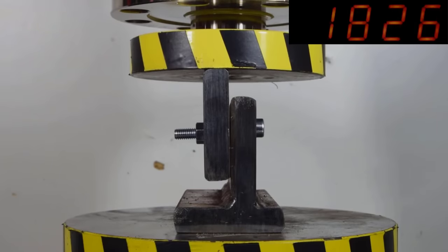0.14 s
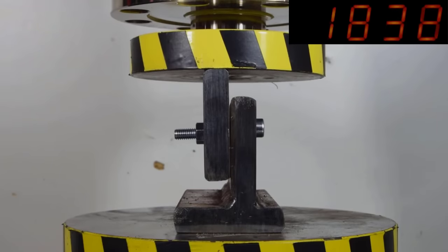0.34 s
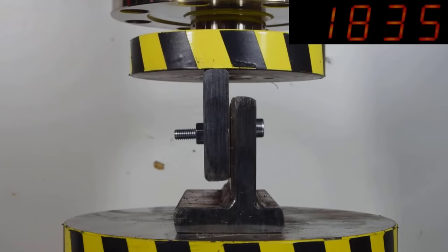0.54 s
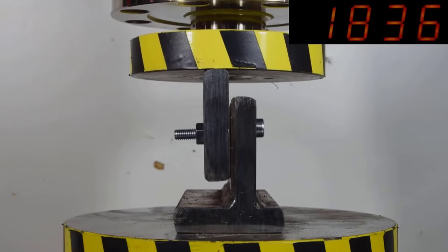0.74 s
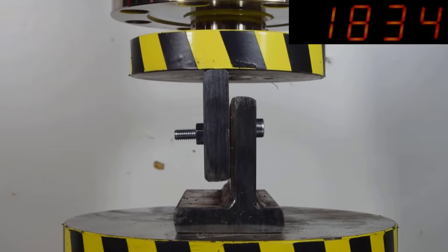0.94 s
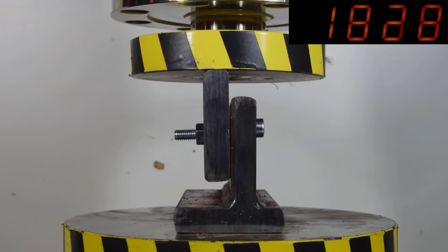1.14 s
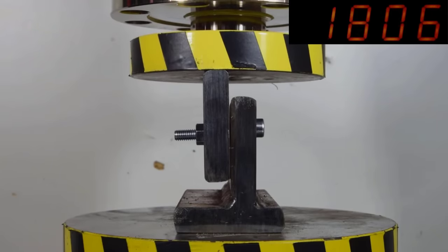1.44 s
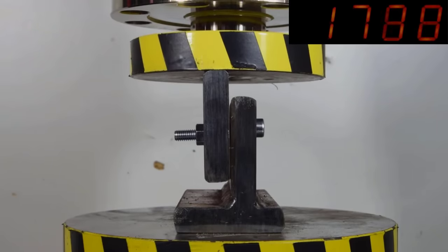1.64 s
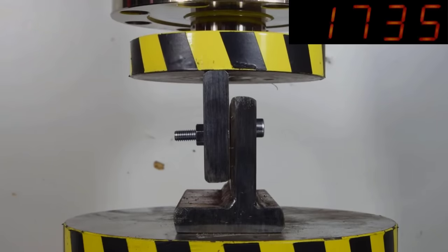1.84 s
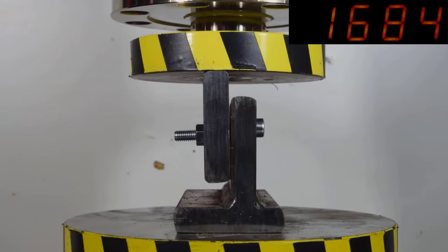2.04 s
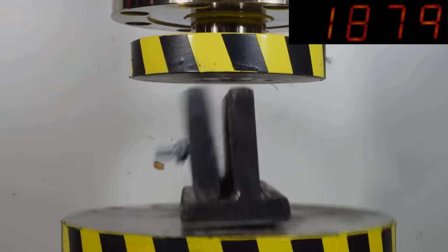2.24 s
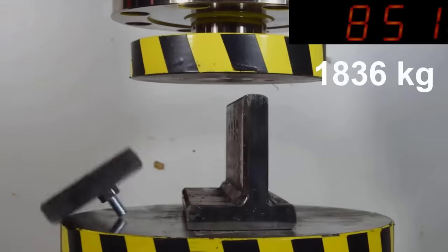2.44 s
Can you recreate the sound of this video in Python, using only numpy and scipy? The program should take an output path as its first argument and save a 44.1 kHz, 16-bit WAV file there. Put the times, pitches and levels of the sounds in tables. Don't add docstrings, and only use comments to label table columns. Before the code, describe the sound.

A steel bolt shears with a very loud, sharp crack at about 2.24 seconds. Before it, a hydraulic pump knocks softly about five times a second over faint, slowly rising motor whine, hum and hiss, with a slight valve puff near 1.3. The frame booms, a plate clatters rapidly until 2.33, bounces ringing at 2.39, then ticks and thuds to 2.6 in a reverberant workshop.

```python
import sys
import numpy as np
from scipy import signal
from scipy.fft import rfft, irfft
from scipy.io import wavfile
from scipy.ndimage import uniform_filter1d, minimum_filter1d

SR = 44100
rng = np.random.default_rng(int(sys.argv[2]) if len(sys.argv) > 2 else 0)


def magnitude_from_level(level_db):
    exponent = np.asarray(level_db, float) / 20
    return 10 ** exponent


def wav_out(sig):
    wavfile.write(sys.argv[1], SR, np.round(np.clip(np.atleast_2d(sig).T, -1, 1) * 32767).astype(np.int16))


N = 114660
BANDS_HZ = 30 * 2 ** np.arange(0, 9.1, .5)


def noise(hz, octaves, size=N):
    f = np.arange(size // 2 + 1) * SR / size + 1e-3
    skirt = 1 + (2 * np.log2(f / hz) / octaves) ** 4
    x = irfft(rfft(rng.standard_normal(size)) / skirt, size)
    return x / x.std()


def read(table, hz, column):
    table = np.array(table)
    return np.interp(np.log(hz), np.log(table[:, 0]), table[:, column])


def since(s, longest=.5):
    return np.arange(int(s * SR) + 1, min(N, int((s + longest) * SR))) / SR - s


def add(out, s, x):
    at = int(s * SR) + 1
    out[at:at + len(x)] += x


def fade(u, t60):
    return np.exp(-np.log(1000) * u / t60)


def ring(modes, u, jitter=0., loose=1):
    out = 0
    for hz, db, t60 in modes:
        level_luck, pitch_luck, phase_luck = rng.standard_normal(3)
        pitch = hz * (1 + 0.12 * jitter * pitch_luck)
        level = magnitude_from_level(db + 60 * jitter * level_luck)
        out = out + level * fade(u, t60) * np.sin(2 * np.pi * pitch * u + loose * phase_luck)
    return out


def shudder(bank, table, s, u):
    at, out = int(s * SR), 0
    for hz, x in zip(BANDS_HZ, bank):
        if table[0][0] / 2 < hz < table[-1][0] * 2:
            out = out + magnitude_from_level(read(table, hz, 1)) * fade(u, read(table, hz, 2)) * x[at:at + len(u)]
    return out


def bursts(rows, octaves):
    out = np.zeros(N)
    for s, db, t60, hz in rows:
        u = since(s)
        add(out, s, magnitude_from_level(db) * fade(u, t60) * noise(hz, octaves, size=SR // 2)[:len(u)])
    return out


# (frequency [Hz], level [dB per Hz])
SHOP_SPECTRUM = [(25, -11), (60, -18), (150, -9.5), (500, -10.5), (1200, -15.5), (2500, -22), (7700, -36.5),
                 (16000, -42)]
SHOP_DB = -73.5


def shop():
    out = 0
    for hz in BANDS_HZ:
        out = out + magnitude_from_level(read(SHOP_SPECTRUM, hz, 1)) * hz ** .5 * noise(hz, 0.63)
    return magnitude_from_level(SHOP_DB) * out / out.std()


# (time [s], pitch [Hz], load boost [dB])
MOTOR_LOAD = [
    (0, 996.5, 6),
    (1.101, 1014, 3),
    (1.75, 1022, 8),
    (2.24, 1029, 13),
]
# (multiple, level [dB])
MOTOR_HARMONICS = [(1, -83.5), (2, -88.5), (3, -91), (4, -93.5), (5, -95.5), (6, -101), (8, -99)]
# (multiple, centre [s], half width [s], boost [dB])
MOTOR_SWELLS = [(1, 0.29, 0.29, 5.5), (3, .17, 0.087, 5), (3, 1.1, 0.17, 7), (3, 2.037, 0.18, 13),
                (4, 0.11, 0.1, 6.5), (4, .5, 0.1, 5), (5, 0.27, .22, 8), (5, 1.28, .2, 7),
                (5, 1.773, 0.17, 3), (6, 0.71, 0.27, 12), (6, 1.2, .2, 11.5), (6, 2.0, 0.14, 14)]


def whine(t):
    s, hz, load_db = np.array(MOTOR_LOAD).T
    phase = 2 * np.pi * np.cumsum(np.interp(t, s, hz)) / SR
    out = 0
    for k, db in MOTOR_HARMONICS:
        flicker = uniform_filter1d(uniform_filter1d(rng.standard_normal(N), size=2500), size=2500)
        db = db + 1.2 * flicker / flicker.std()
        if k == 2:
            db = db + np.interp(t, s, load_db)
        for multiple, centre, width, up_db in MOTOR_SWELLS:
            if multiple == k:
                db = db + up_db * np.exp(-((t - centre) / width) ** 2)
        out = out + magnitude_from_level(db) * np.sin(k * phase)
    return out


# (time [s], level [dB], clank level [dB], tick level [dB], tap level [dB])
STROKES = [(0.084, -49.5, -61, -76, -75), (0.282, -51.5, -68, -83.5, -73), (0.498, -51.5, -66, -92, -69),
           (0.712, -51.5, -60, -75.5, -74), (0.901, -49.5, -67, -81, -73.5),
           (1.079, -50.5, -67.5, -87, -69.5), (1.258, -51.5, -59.5, -77.5, -78),
           (1.443, -51.5, -69, -83, -69.5), (1.623, -50, -66, -91, -72.5), (1.8, -50.5, -60.5, -75.5, -79),
           (1.988, -52, -67, -82, -72), (2.161, -52, -66.5, -84, -70.5)]
# (delay [s], level [dB])
PISTON_REBOUNDS = [
    (0, 0),
    (.011, -3),
    (.019, -4.5),
    (0.045, -6.5),
    (0.076, -19),
]
# (frequency [Hz], level [dB], t60 [s])
HOUSING_MODES = [(181.6, -18.5, 0.3), (254.3, -16, 0.25), (406, -8, 0.2), (428, -6.5, 0.11),
                 (486.6, -5.5, 0.11), (509.7, -1, 0.24), (699, -11, 0.16), (806, -8, 0.082),
                 (980, -11, 0.084)]
CLANK_MODES = [(1227, 2, 0.088), (1278, -2, 0.17), (1635, -8.5, 0.1)]
TICK_MODES = [(5370, -9.5, 0.079), (6900, -4, 0.033), (7480, -2.5, 0.034), (7650, -1.5, .04)]
TAP_MODES = [(2174, -4.5, 0.051), (2413, 1, 0.046), (2566, -3, 0.051), (2817, -1.5, 0.053),
             (2847, -15, 0.56)]
# (frequency [Hz], level [dB], t60 [s])
STROKE_SHUDDER = [(208, -39.5, 0.26), (450, -17, 0.24), (1140, -17, 0.24), (2350, -28.5, 0.13),
                  (3630, -39.5, 0.23)]
CLICK_SHUDDER = [(2500, -10, 0.098), (4960, -5.5, 0.14), (8000, -4, 0.087), (12000, -12, 0.033)]
PUSH_S, SEAT_S = 0.0049, 0.027


def pump(bank):
    out = np.zeros(N)
    for s, db, clank_db, tick_db, tap_db in STROKES:
        start = s - .002
        u = since(start, .3)
        rumble = np.clip(u / PUSH_S, 0, 1) * magnitude_from_level(db) * shudder(bank, STROKE_SHUDDER, s, u)
        click = magnitude_from_level(tick_db - 0.5) * shudder(bank, CLICK_SHUDDER, s, u)
        add(out, start, rumble + click)
        u = u[:SR // 6]
        push = np.clip(u / PUSH_S, 0, 1)
        for late, less_db in PISTON_REBOUNDS:
            hit = magnitude_from_level(db - 3.0) * ring(HOUSING_MODES, u, 0.019)
            hit = hit + magnitude_from_level(clank_db + 3.5) * ring(CLANK_MODES, u, 0.026)
            hit = hit + magnitude_from_level(tick_db + 7.0 + less_db) * ring(TICK_MODES, u, 0.047)
            hit = hit + magnitude_from_level(tap_db + 4 + less_db) * ring(TAP_MODES, u, 0.052)
            seated = (late < SEAT_S) / (1 + np.exp((SEAT_S - late - u) / 0.0028))
            add(out, start + late, magnitude_from_level(less_db) * push * magnitude_from_level(-9 * seated) * hit)
    return out


# (time [s], level [dB], t60 [s], centre [Hz])
CRACK_BURSTS = [
    (2.2408, -33, 0.029, 12800),
    (2.3885, -33, 0.029, 5970),
    (2.3885, -39.5, 0.21, 5900),
    (2.4758, -37.5, 0.0089, 8000),
    (2.4758, -43, .02, 14000),
    (2.568, -49, .02, 13000),
    (2.574, -48.5, 0.024, 10000),
    (2.582, -38, 0.084, 224),
    (.223, -82, .03, 9000),
    (.921, -84, .06, 12000),
]


def cracks():
    return bursts(CRACK_BURSTS, 1.0)


# (time [s], level [dB], t60 [s], centre [Hz])
VALVE_PUFFS = [
    (1.33, -69, 0.41, 5400),
    (2.0, -76.5, 0.26, 3950),
]


def puffs():
    return bursts(VALVE_PUFFS, 2.5)


SNAP_S = 2.2408
# (frequency [Hz], level [dB], t60 [s])
FRAME_MODES = [(170, -33, .5), (335, -27, .8), (368, -22, .5), (389, -7, .3), (408, -20, .25),
               (448, -24, .4), (497, -31, .7), (750, -25, .12), (958, -26, .1), (1257, -30, .08),
               (1570, -26, .1), (2430, -33, .5), (15440, -28, .2)]
# (frequency [Hz], level [dB], t60 [s])
SNAP_SHUDDER = [(70, -60, 0.57), (119, -44, 0.45), (166, -34, 0.69), (350, -30, 0.76), (1002, -26.5, 0.5),
                (3450, -27, 0.17), (9000, -25, 0.1), (14900, -19.5, 0.11)]
FRAME_RISE_S = 0.015


def frame(bank):
    out, u = np.zeros(N), since(SNAP_S)
    swing = 1 - np.exp(-u / FRAME_RISE_S)
    add(out, SNAP_S, swing * ring(FRAME_MODES, u) + shudder(bank, SNAP_SHUDDER, SNAP_S, u))
    return out


# (frequency [Hz], level [dB], t60 [s])
SNAP_MODES = [(3010, -22, .05), (3250, -21, .05), (3690, -17, .05), (5240, -16, .3), (5882, -33, .2),
              (9935, -15, .04), (9730, -16, .03), (6495, -44, .85), (7214, -21, .2), (7520, -28, .07),
              (9486, -28, .3), (9555, -15, .2), (9622, -17, .05), (10360, -32, .45), (11310, -22, .05),
              (12350, -26, .09), (13925, -30, .26)]
KNOCKED_MODES = [(3970, -24, .05), (5292, -28, .2), (6305, -29, .14), (7164, -22, .08), (8600, -30, .05),
                 (9553, -26, .15), (11255, -31, .22), (12385, -34, .2), (13887, -38, .15)]
# (frequency [Hz], level [dB], t60 [s])
CAUGHT_MODES = [(5238, -15, .4), (13935, -37, .3), (15440, -43, .2)]
FREE_MODES = [(497, -33, .5), (2426, -43, .5), (5233, -33, .7), (5279, -42, .7), (5322, -47, .7),
              (6495, -48, 1.1), (7246, -32, .42), (7265, -34, .45), (10355, -48, .45), (11270, -57, .6)]
KNOCKED_S, BOUNCE_S = 2.2815, 2.3885
SNAP_RISE_S, BOUNCE_RISE_S = 0.00056, .0008
FREE_S, CATCH_S, LOSS_DB = .044, .005, -30


def plate():
    out, u = np.zeros(N), since(SNAP_S)
    add(out, SNAP_S, np.clip(u / SNAP_RISE_S, 0, 1) * magnitude_from_level(-0.5) * ring(SNAP_MODES, u, loose=0))
    add(out, KNOCKED_S, magnitude_from_level(0.4) * ring(KNOCKED_MODES, since(KNOCKED_S), loose=0))
    u = since(BOUNCE_S)
    landed = magnitude_from_level(LOSS_DB / (1 + np.exp((FREE_S - u) / CATCH_S)))
    bounce = landed * ring(CAUGHT_MODES, u, loose=0) + ring(FREE_MODES, u, loose=0)
    add(out, BOUNCE_S, np.clip(u / BOUNCE_RISE_S, 0, 1) * bounce)
    return out


# (frequency [Hz], level [dB] (unused here), t60 [s])
BRACKET_MODES = [(1045, -3, .05), (1300, -8, .05), (1590, 0, .04), (2030, -8, .05), (2215, -6, .08),
                 (2425, 0, .13), (3300, -7, .04), (4270, -6, .07), (4900, -6, .04)]
# (time [s], level [dB], favoured pitch [Hz], length before damping [s])
BLOWS = [(2.2736, -15, 1560, 0.0051), (2.2805, -9, 1620, 0.0058), (2.284, -15.5, 3300, 0.0057),
         (2.2875, -11, 2490, .018), (2.289, -13, 1045, 0.006), (2.296, -16.5, 2320, 0.011),
         (2.302, -19.5, 2500, 0.0041), (2.311, -22.5, 2500, 0.0115), (2.329, -24, 4270, 0.022),
         (2.376, -25, 2480, 0.011), (2.411, -29, 2480, 0.081), (2.45, -30, 1590, .015)]
# (frequency [Hz], level [dB], t60 [s])
CRASH_SHUDDER = [(336, -45, 0.68), (690, -30.5, 0.62), (1510, -29.5, 0.66), (3220, -21, 0.37),
                 (4880, -22, 0.38), (7860, -34, 0.25), (15000, -30, .2)]
CRASH_S, CRASH_RISE_S = 2.277, 0.0026
FAVOUR_DB_PER_OCTAVE, DAMPED_DB, DAMPING_S = -30, -16, 0.0037


def clatter(bank):
    out, u = np.zeros(N), since(CRASH_S)
    add(out, CRASH_S, np.clip(u / CRASH_RISE_S, 0, 1) * shudder(bank, CRASH_SHUDDER, 1, u))
    for s, db, pitch_hz, length in BLOWS:
        u = since(s, .2)
        modes = [(hz, FAVOUR_DB_PER_OCTAVE * abs(np.log2(hz / pitch_hz)), t60) for hz, _, t60 in BRACKET_MODES]
        damping_db = DAMPED_DB * np.clip((u - length) / DAMPING_S, 0, 1)
        add(out, s, magnitude_from_level(db + damping_db) * ring(modes, u, loose=0))
    return out


# (frequency [Hz], t60 [s], level [dB])
ROOM_TAIL = [(100, 0.93, -5.5), (300, 0.68, -9), (960, 0.5, -4), (3240, 0.68, -7), (7240, 0.57, -7),
             (14100, 0.81, -18)]
ROOM_GAP_S = .012


def room(x):
    tail, u = 0, np.arange(SR // 2) / SR
    for hz in BANDS_HZ[2::2]:
        t60 = read(ROOM_TAIL, hz, 1)
        level = magnitude_from_level(read(ROOM_TAIL, hz, 2)) * (hz / t60) ** .5
        tail = tail + level * noise(hz, 0.98, size=len(u)) * fade(u, t60) * (u > ROOM_GAP_S)
    return signal.fftconvolve(x, tail * np.sqrt(20) / SR)[:N]


PLATE_WET_DB, FRAME_WET_DB = -8, -4


def scene():
    bank = [noise(hz, 0.52) for hz in BANDS_HZ]
    near = pump(bank) + puffs() + cracks()
    steel = plate()
    boom = frame(bank) + clatter(bank)
    wet = room(near + magnitude_from_level(PLATE_WET_DB) * steel + magnitude_from_level(FRAME_WET_DB) * boom)
    background = whine(np.arange(N) / SR) + shop()
    return (near + steel + boom + wet + background)[None]


def roll_off(x):
    return signal.sosfilt(signal.butter(12, 16830, fs=SR, output="sos"), x)


LIMIT, CEILING = .62, .42
HOLD_S, TOP_HZ = .005, 15700


def record(dry):
    hold = int(HOLD_S * SR)
    gain = minimum_filter1d(np.minimum(1, LIMIT / (np.abs(dry) + 1e-9)), hold)
    x = dry * uniform_filter1d(gain, hold)
    x = x / (1 + (x / CEILING) ** 4) ** .25
    x = signal.sosfilt(signal.ellip(8, .2, 60, TOP_HZ, fs=SR, output="sos"), x)
    return roll_off(x)


dry = scene()
out = record(dry)
wav_out(out)
```